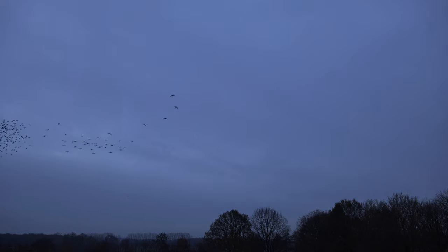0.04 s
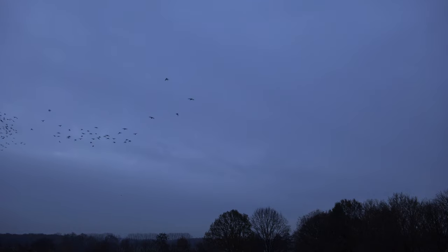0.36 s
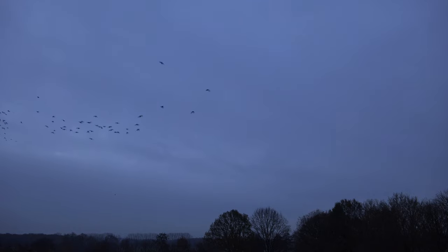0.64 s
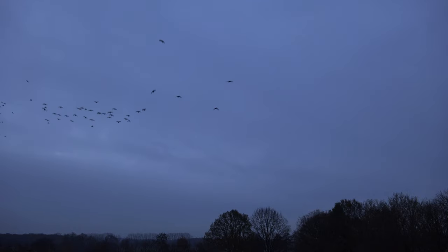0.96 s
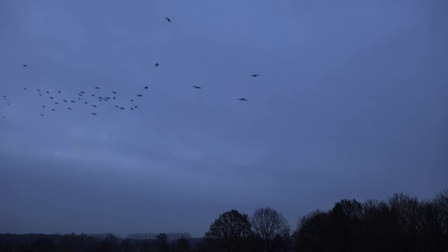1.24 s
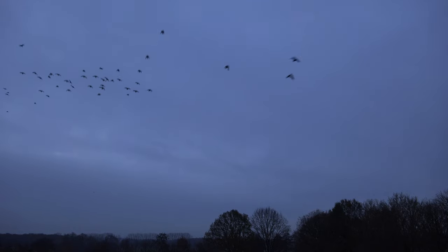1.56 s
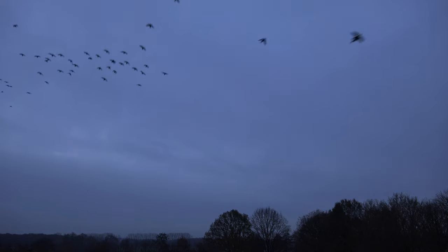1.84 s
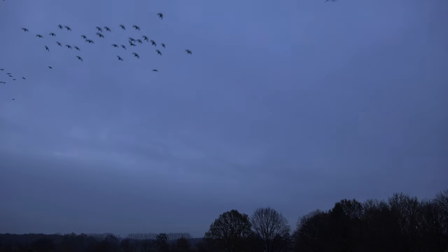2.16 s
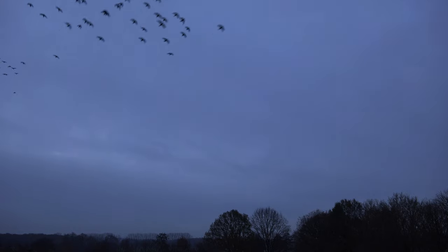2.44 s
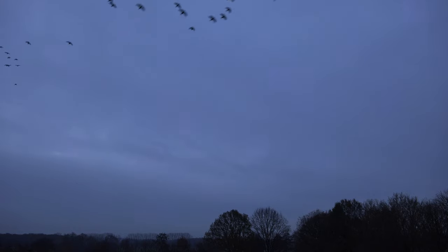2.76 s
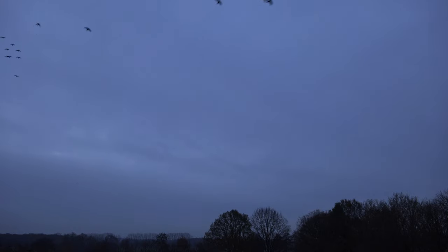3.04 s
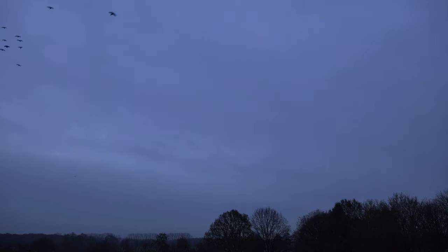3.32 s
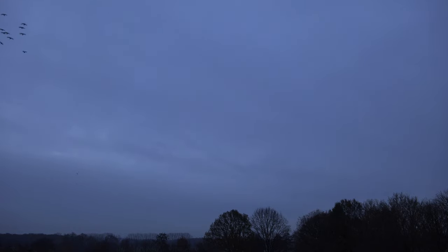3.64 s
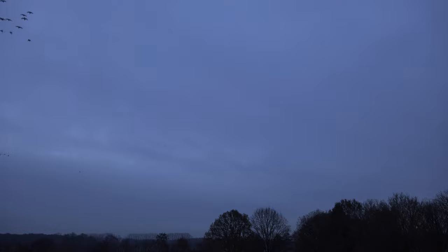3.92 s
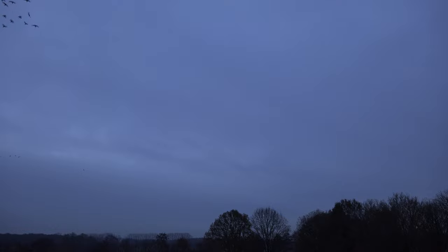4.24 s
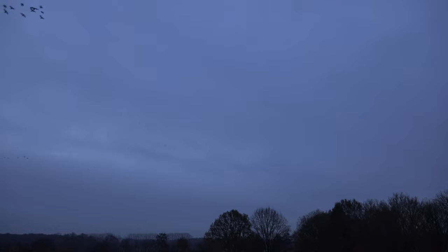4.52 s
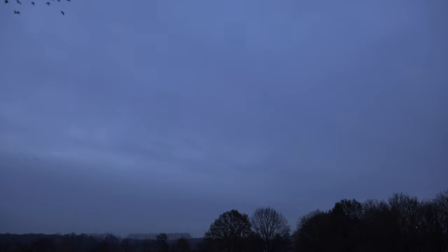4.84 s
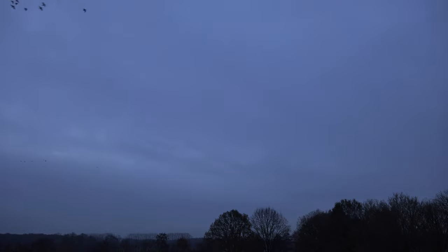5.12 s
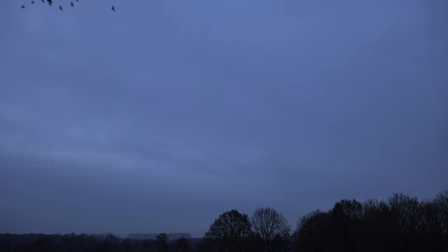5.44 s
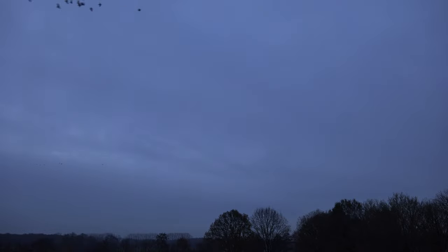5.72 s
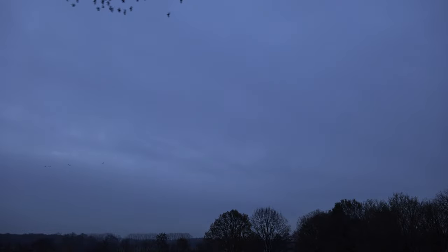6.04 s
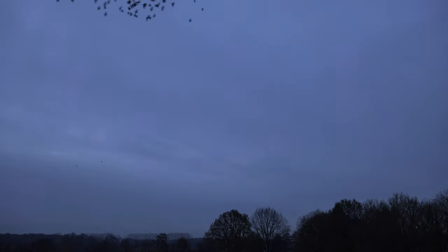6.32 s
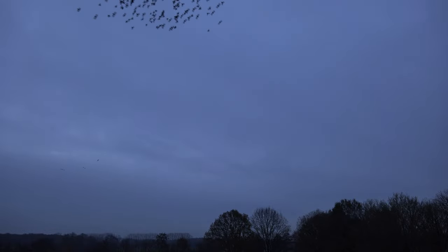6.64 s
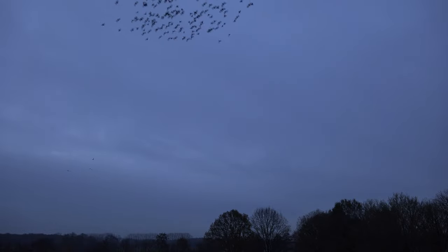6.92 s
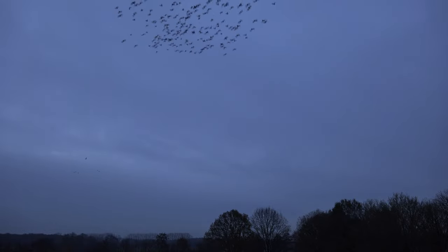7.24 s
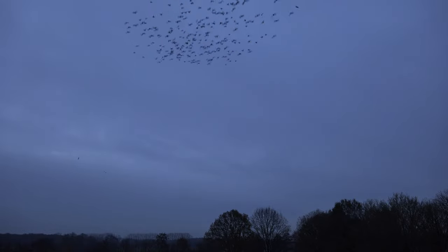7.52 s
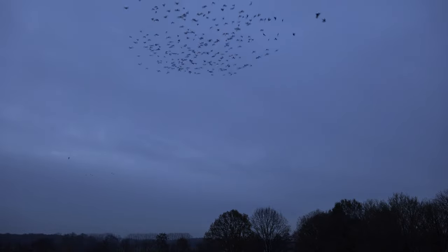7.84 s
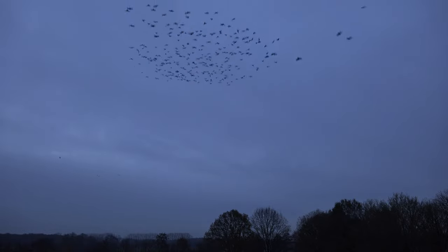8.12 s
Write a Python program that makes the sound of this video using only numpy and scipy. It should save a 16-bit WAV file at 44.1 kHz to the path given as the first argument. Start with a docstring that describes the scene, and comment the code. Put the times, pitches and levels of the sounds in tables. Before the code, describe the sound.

A flock of jackdaws calls in ringing, rasping volleys that merge into a dense clamour, over a low rumble of far traffic.

```python
"""Jackdaws over open fields at dusk. Traffic, a far engine and a wash of distant birds sound throughout.
From the start the flock calls in volleys of ringing 'kya', each a short falling stack of harmonics;
ground and trees throw the calls back. Hard, rasping 'tchak' calls join at 0.6 s.
Between 1.7 and 5.7 s a small bird chips five times. From about 5.5 s the volleys merge into one
dense clamour with single yelps in it, at full strength from 7 s to the end."""
import sys
import numpy as np
from scipy import signal
from scipy.fft import rfft, irfft
from scipy.io import wavfile
from scipy.ndimage import uniform_filter1d

SR = 44100
rng = np.random.default_rng(int(sys.argv[2]) if len(sys.argv) > 2 else 0)


def dump_mix(stems):
    """Bounce the given channels to the path in sys.argv[1] as a 16-bit WAV at rate SR."""
    frames = np.atleast_2d(stems).T  # one column per channel
    limited = np.clip(frames, -1, 1)  # hard clip at full scale
    pcm = np.round(limited * 32767).astype(np.int16)
    wavfile.write(sys.argv[1], SR, pcm)


N = 369116


def undb(db):
    """Decibels to gain."""
    return 10 ** (np.asarray(db) / 20)


def unit(x):
    """Scale to rms 1."""
    return x / np.sqrt(np.mean(x ** 2) + 1e-18)


def curve(table):
    """Each column of a time table, linearly interpolated."""
    s, *columns = np.transpose(table)
    return [np.interp(np.arange(N) / SR, s, c) for c in columns]


def gain_at(hz, spectrum):
    """Gain of a (frequency [Hz], level [dB]) spectrum at hz."""
    f, db = np.transpose(spectrum)
    return undb(np.interp(np.log(hz + 1), np.log(f), db))


def noise(spectrum, size=N):
    """Coloured noise, rms 1."""
    gains = gain_at(np.fft.rfftfreq(size, 1 / SR), spectrum)
    return unit(irfft(rfft(rng.standard_normal(size)) * gains, size))


def wander(size, rate_hz):
    """Random values at rate_hz, linearly interpolated."""
    at = np.arange(size) * rate_hz / SR
    points = np.random.default_rng(rng.integers(2 ** 31)).standard_normal(int(at[-1]) + 2)
    return np.interp(at, np.arange(len(points)), points)


def add(out, start_s, x):
    """Mix x in at start_s."""
    i = int(np.clip(start_s * SR, 0, N))
    out[i:i + len(x)] += x[:N - i]


# Traffic spectrum: (frequency [Hz], relative density [dB])
TRAFFIC_SPECTRUM = [(22, -42), (48, -11), (80, 3), (105, 0), (170, -6), (245, -9), (283, -6), (320, -11.5),
                    (480, -13), (700, -17), (1500, -21), (3500, -36), (8000, -43), (15000, -46)]
# Traffic swell: (time [s], relative level [dB])
TRAFFIC_SWELL = [(0, -43.5), (2.5, -45), (5, -44.5), (8.37, -44)]
def traffic(gain_db=-3.0):
    """Far traffic: a low, gently swelling rumble."""
    return noise(TRAFFIC_SPECTRUM) * undb(curve(TRAFFIC_SWELL)[0] + gain_db + .5 * wander(N, 3.15))


# Engine run: (time [s], firing rate [Hz], level [dB])
ENGINE_RUN = [(0, 62.5, -46.5), (1.2, 62.8, -46), (2.4, 63, -46.5), (3.6, 62.4, -49.5), (4.8, 62.4, -54),
              (6, 63, -51), (7.2, 63, -48.5), (8.37, 62.6, -47.5)]
def engine():
    """A far engine drones at its slightly unsteady firing rate."""
    hz, db = curve(ENGINE_RUN)
    firing_hz = hz * (1 + 0.0072 * wander(N, 3.1))
    return unit(np.sin(2 * np.pi * np.cumsum(firing_hz) / SR)) * undb(db)


def road_whine(hz=284, level_db=-61):
    """A faint tone, wavering in pitch and level."""
    pitch_hz = hz * (1 + 0.01215 * wander(N, 11))
    tone = np.sin(2 * np.pi * np.cumsum(pitch_hz) / SR)
    return unit(tone * undb(2 * wander(N, 2.3))) * undb(level_db)


# Farthest birds, dulled by the air: (frequency [Hz], relative density [dB])
WASH_SPECTRUM = [(600, -16), (1200, -3), (2000, 0), (2400, 0), (2700, -4), (3000, -15), (5000, -17),
                 (6300, -27), (15000, -55)]
# Their swell: (time [s], level [dB])
WASH_SWELL = [(0, -49), (1.8, -50), (4.3, -47), (8.37, -43)]
def far_flock():
    """Distant calls merge into a dull, restless wash of noise."""
    return noise(WASH_SPECTRUM) * undb(curve(WASH_SWELL)[0] + wander(N, 33))


def voice(pitch_hz, rasp, colour, tilt_db_oct, spread_db=3.0, rasp_hz=900, shimmer=5, harmonics=13):
    """Harmonics of an uneven pitch slide under a fixed tone colour, their levels varied for each call."""
    size = len(pitch_hz)
    phase = 2 * np.pi * np.cumsum(pitch_hz * (1 + rasp * wander(size, 2 * rasp_hz))) / SR
    k = np.arange(1, harmonics + 1)[:, None]
    octaves_up = np.log2(np.maximum(k * pitch_hz / 2400, 1))
    own_db = spread_db * rng.standard_normal((harmonics, 1))
    gains = gain_at(k * pitch_hz, colour) * undb(tilt_db_oct * octaves_up + own_db)
    tone = (gains * np.sin(k * phase + rng.uniform(0, 2 * np.pi, (harmonics, 1)))).sum(axis=0)
    return tone * (1 + shimmer * rasp * wander(size, rasp_hz))


# Tone colour of a 'kya' as heard, strong near 1.6-2.5 kHz; a dip at 3 kHz runs through the whole scene:
# (frequency [Hz], gain [dB])
KYA_COLOUR = [(600, -5), (900, -7), (1250, -11), (1400, -6), (1600, 14), (2000, 2.5), (2400, 3),
              (2720, 0.5), (3000, -9.5), (4000, -12), (5100, -9), (6200, -19), (8200, -24.5), (11000, -39),
              (15000, -58)]
def kya(length_s, hz, fall, tilt_db_oct, rough, attack_s=0.005, max_drop_s=.046, sag_per_s=.4):
    """One 'kya': the pitch nearly holds, then drops while the cycles grow uneven."""
    crest, release, end = 0.12, 0.78, 1.456  # in units of drop_s
    drop_s = np.clip(length_s, .01, max_drop_s)
    hold_s = max(length_s - drop_s, 0)
    t = np.arange(int((hold_s + drop_s * end) * SR)) / SR
    u = np.maximum(t - hold_s, 0) / drop_s
    dive = u * (u - crest) / (1 - crest) / (1 + 0.1406 * u ** 4)
    pitch_hz = hz * (1 - sag_per_s * t - np.clip(fall, 0, .6) * dive)
    rasp = rough * (0.25 + u ** 3)
    envelope = np.clip(t / attack_s, 0, 1) * np.clip((end - u) / release, 0, 1)
    return unit(voice(pitch_hz, rasp, KYA_COLOUR, tilt_db_oct - 1.7) * envelope)


# Near 'kya' calls:
# (time [s], nominal length [s], pitch [Hz], relative level [dB], relative treble tilt [dB/oct])
KYA_CALLS = [(0.024, 0.021, 1244, -34, -19), (0.111, 0.03, 1178, -30.5, -6),
             (0.25, 0.028, 1433, -31.5, 0.5), (0.314, 0.032, 995, -31, -10),
             (0.374, 0.037, 1382, -28.5, -5), (0.521, 0.025, 1434, -30.5, 1.5),
             (0.812, 0.051, 1385, -23, 4), (0.853, 0.042, 1412, -19.5, -4), (0.985, 0.027, 1092, -31, -27),
             (1.07, 0.05, 1434, -28.5, -5), (1.374, 0.04, 1351, -27, -3.5), (1.889, 0.031, 1413, -32.5, 0),
             (1.957, 0.029, 1194, -27.5, -3), (2.13, 0.031, 1098, -30.5, -1),
             (2.204, 0.029, 1366, -27.5, 2), (2.378, 0.024, 1390, -29, -1), (2.545, 0.065, 1350, -22, 0.5),
             (2.628, 0.024, 1313, -27, -10), (2.979, 0.04, 1350, -17, -1.5), (3.038, 0.04, 1357, -26, 2),
             (3.373, 0.041, 1290, -33, 3), (3.492, 0.02, 1370, -27, -2), (3.531, 0.032, 1339, -26.5, 2),
             (3.697, 0.064, 1219, -28.5, -0.5), (3.757, 0.069, 1100, -37, 7.5),
             (4.025, 0.034, 1354, -27, 5.5), (4.226, 0.037, 1286, -35.5, 0.5),
             (4.284, 0.023, 1002, -34.5, -6), (4.364, 0.055, 1330, -28.5, 0.5),
             (4.521, 0.028, 1367, -29.5, -1), (4.585, 0.035, 1440, -28.5, -1),
             (4.854, 0.032, 1284, -27.5, 2.5), (4.897, 0.03, 1330, -29.5, -3),
             (5.07, 0.031, 1237, -29, 3.5), (5.257, 0.03, 1400, -26.5, -1),
             (5.311, 0.036, 1407, -34.5, -0.5), (5.546, 0.03, 1358, -29, -1),
             (5.593, 0.03, 1372, -26, -1.5), (5.657, 0.025, 1364, -25, 0.5), (5.809, 0.031, 1343, -31.5, 2),
             (5.831, 0.032, 1254, -27.5, 1.5), (6.053, 0.035, 1260, -26, 2.5),
             (6.107, 0.043, 1270, -29.5, 1.5), (6.203, 0.032, 1400, -24, 1), (6.267, 0.034, 1435, -31, 4),
             (6.444, 0.051, 1370, -34.5, -1), (6.667, 0.044, 1325, -30.5, -15),
             (6.765, 0.039, 1346, -28.5, 2), (6.86, 0.022, 1315, -27, 3), (6.932, 0.038, 1260, -27, 4),
             (6.969, 0.045, 1356, -30, -3), (7.076, 0.047, 1322, -29, 5), (7.13, 0.033, 1383, -23.5, 0),
             (7.175, 0.024, 1383, -40, -10), (7.268, 0.032, 1302, -26.5, 1.5),
             (7.318, 0.034, 1296, -28, -19), (7.41, 0.035, 1303, -29.5, 2), (7.467, 0.019, 1352, -28, -3),
             (7.511, 0.045, 1362, -39, 11), (7.86, 0.034, 1300, -26.5, -2), (7.897, 0.031, 1258, -30, 3),
             (8.015, 0.03, 1370, -30, -10), (8.065, 0.037, 1402, -33, -9)]
def near_kyas(fall=.24, rough=0.024, gain_db=-4.5):
    """Ringing calls of the nearest birds, as (time [s], sound)."""
    return [(s, kya(length_s, hz, fall, tilt, rough) * undb(db + gain_db))
            for s, length_s, hz, db, tilt in KYA_CALLS]


def smear(x, spread_s):
    """A reflection from many branches, spread over spread_s."""
    size = int(spread_s * SR)
    branches = wander(size, SR) * np.hanning(size)
    return signal.fftconvolve(x, branches / np.linalg.norm(branches))


def with_reflections(calls, ground_db=-9, trees_db=-9, spread_s=0.023):
    """Each call, its quick bounce off the ground and a later, smeared one off the trees."""
    out = np.zeros(N)
    for (s, call), (ground, trees) in zip(calls, rng.random((len(calls), 2))):
        add(out, s, call)
        add(out, s + 0.0018 + .007 * ground, call * undb(ground_db))
        add(out, s + .015 + 0.023 * trees, smear(call, spread_s) * undb(trees_db))
    return out


def wood_edge(x, t60_s=0.34, split_hz=5000, build_s=0.026, treble_db=-2):
    """Trunks and twigs scatter a short tail with slightly softened treble."""
    t = np.arange(SR) / SR
    low = signal.sosfilt(signal.butter(2, split_hz, fs=SR, output="sos"), rng.standard_normal(SR))
    high = signal.sosfilt(signal.butter(2, split_hz, "high", fs=SR, output="sos"), rng.standard_normal(SR))
    envelope = (1 - np.exp(-t / build_s)) * undb(-60 * t / t60_s)
    tail = (low + undb(treble_db) * high) * envelope / np.linalg.norm(envelope)
    return signal.fftconvolve(x, tail)[:N]


# Volleys, one bird setting off its neighbours: (time [s], hold [s], relative level [dB])
FLOCK_VOLLEYS = [(0.052, 0.071, -31), (0.295, 0.1, -33.5), (0.565, 0.09, -29), (0.754, 0.45, -35),
                 (1.343, 0.034, -28.5), (1.953, 0.17, -32.5), (2.262, 0.029, -28.5), (2.448, 0.094, -30),
                 (2.583, 0.3, -27.5), (3.001, 0.059, -29), (3.158, 0.11, -28.5), (3.423, 0.16, -32),
                 (3.969, 0.059, -32.5), (4.08, 0.16, -42.5), (4.41, 0.075, -41.5), (4.591, 0.13, -28),
                 (4.917, 0.053, -29.5), (5.102, 0.35, -32), (5.666, 0.05, -32.5), (5.856, 0.14, -29),
                 (6.23, 0.11, -29.5), (6.54, 0.092, -31)]
# Clamour, growing as the main flock comes overhead: (time [s], relative level [dB])
CLAMOUR_SWELL = [(0, -88), (4.3, -52), (5.7, -37.5), (6.1, -35.5), (6.7, -34), (6.9, -29), (7.4, -30),
                 (8.37, -29.5)]
def flock_envelope(rise_s=0.056, fade_tau_s=0.056):
    """Each volley builds, holds and dies away; its power adds to the clamour's."""
    t = np.arange(N) / SR
    power = undb(curve(CLAMOUR_SWELL)[0]) ** 2
    for s, hold_s, db in FLOCK_VOLLEYS:
        rise = np.clip(1 + (t - s) / rise_s, 0, 1)
        fade = np.exp(-np.maximum(t - s - hold_s, 0) / fade_tau_s)
        power += (undb(db) * rise * fade) ** 2
    return np.sqrt(power)


def flock(count=560, hz=1290, spread_hz=125, length_s=.032, rough=0.081, distance_db=7.0, gain_db=-2):
    """Many birds further off, each at its own pitch and distance, calling in waves."""
    out = np.zeros(N)
    for i, (jitter, detune, stretch, fall, near) in enumerate(rng.standard_normal((count, 5))):
        s = i / count * N / SR + .012 * jitter
        nearness = np.tanh(near)
        call = kya(length_s * np.exp(.25 * stretch), hz + spread_hz * detune,
                   fall=.27 + 0.0604 * fall, tilt_db_oct=1.3 + 2.2 * nearness, rough=rough)
        add(out, s, call * undb(distance_db * nearness))
        add(out, s, smear(call, spread_s=0.055))  # scattered part: independent of distance
    running_rms = np.sqrt(np.abs(uniform_filter1d(out ** 2, SR // 14)) + 1e-6)
    return out / running_rms * flock_envelope() * undb(gain_db)


# Tone colour of a 'tchak' as heard, strong near 1.6-2.5 kHz; a dip at 3 kHz runs through the whole scene:
# (frequency [Hz], gain [dB])
TCHAK_COLOUR = [(600, -21.5), (1000, -11.5), (1550, 3), (2000, 6.5), (2450, 4.5), (3000, -12), (3700, -9.5),
                (4800, -12), (6100, -36.5), (6900, -24), (10500, -33.5), (13000, -47.5), (15500, -54)]
def tchak(length_s, hz, tilt_db_oct, fall=.35, hiss_db=-12, hiss_tau_s=0.055, hiss_db_oct=-5.5):
    """One 'tchak': a hard onset that sinks at once in pitch and breaks up into a hoarse hiss."""
    attack, decay = 0.077, 0.84  # in units of length_s
    t = np.arange(SR // 7) / SR
    u = t / length_s
    pitch_hz = hz * (1.05 - fall * np.tanh(u))
    breakup = np.minimum(u, 1) ** 2
    tone = unit(voice(pitch_hz, .014 + .04 * breakup, TCHAK_COLOUR, tilt_db_oct))
    envelope = np.clip(u / attack, 0, 1) * np.exp(-(u / decay) ** 1.4)
    hiss_spectrum = [(f, db + hiss_db_oct * np.log2(f / 2400)) for f, db in TCHAK_COLOUR]
    hiss = noise(hiss_spectrum, len(t)) * breakup * np.exp(-np.maximum(t - length_s, 0) / hiss_tau_s)
    return tone * envelope + undb(hiss_db) * hiss


# Near 'tchak' calls:
# (time [s], nominal length [s], nominal pitch [Hz], relative level [dB], treble tilt [dB/oct])
TCHAK_CALLS = [(0.567, 0.034, 1163, -22.5, 8), (0.619, 0.036, 1225, -29, 6),
               (0.715, 0.047, 1170, -25.5, 4.5), (0.93, 0.024, 1131, -19.5, 5),
               (1.137, 0.035, 1142, -22, 8), (1.313, 0.047, 1142, -22.5, 4), (2.051, 0.023, 1287, -24, 2.5),
               (2.246, 0.038, 1284, -27, 4), (2.587, 0.031, 1238, -31.5, 8), (2.81, 0.036, 1230, -35, 6),
               (3.939, 0.044, 1164, -30, 4), (5.41, 0.042, 1110, -29.5, 5.5),
               (7.709, 0.045, 1260, -29.5, 4)]
def near_tchaks(gain_db=3.0):
    """Rasping calls of the nearest birds, as (time [s], sound)."""
    return [(s, tchak(length_s, hz, tilt) * undb(db + gain_db))
            for s, length_s, hz, db, tilt in TCHAK_CALLS]


# Chips: (time [s], length [s], nominal pitch [Hz], level [dB], rise time constant [share of length])
BIRD_CHIPS = [(1.753, 0.042, 7860, -46, 0.057), (3.445, 0.05, 8400, -44.5, 0.11),
              (3.803, 0.04, 8500, -46, 0.56), (3.9, 0.063, 8500, -47, 0.69),
              (5.599, 0.054, 8670, -47, 0.12)]
def small_bird():
    """Thin whistled chips that flick up, then level off or sink."""
    out = np.zeros(N)
    for s, length_s, hz, db, rise in BIRD_CHIPS:
        u = np.linspace(0, 1, int(length_s * SR))
        pitch_hz = hz * (1.02 - 0.39 * np.exp(-u / rise) - 0.118 * u ** 2)
        whistle = np.sin(2 * np.pi * np.cumsum(pitch_hz) / SR)
        envelope = np.sqrt(np.abs(np.sin(np.pi * u)))
        add(out, s, unit(whistle * envelope) * undb(db))
    return out


def yelps(per_s=10, hz=1332, spread_hz=40, length_s=0.03, gain_db=-5.5, spread_db=2.0):
    """Fairly near birds call at loose intervals, louder as the clamour grows; as (time [s], sound)."""
    calls = []
    for i, (jitter, detune, stretch, near) in enumerate(rng.standard_normal((int(per_s * N / SR), 4))):
        s = (i + .3 * jitter) / per_s
        db = np.interp(s, *np.transpose(CLAMOUR_SWELL)) + gain_db + spread_db * near
        call = kya(length_s * np.exp(.15 * stretch), hz + spread_hz * detune,
                   fall=.2, tilt_db_oct=-2, rough=0.024)
        calls.append((s, call * undb(db)))
    return calls


def scene(wood_db=-11):
    """Birds, their tail from the trees and the far background, in mono."""
    birds = with_reflections(near_kyas() + near_tchaks() + yelps()) + flock() + small_bird()
    tail = undb(wood_db) * wood_edge(birds)
    background = far_flock() + engine() + road_whine() + traffic()
    return (birds + tail + background)[None]


def record(dry, cutoff_hz=15700):
    """Steep low-pass on the top treble."""
    return signal.sosfilt(signal.ellip(10, .2, 70, cutoff_hz, fs=SR, output="sos"), dry)


dry = scene()
out = record(dry)
dump_mix(out)
```